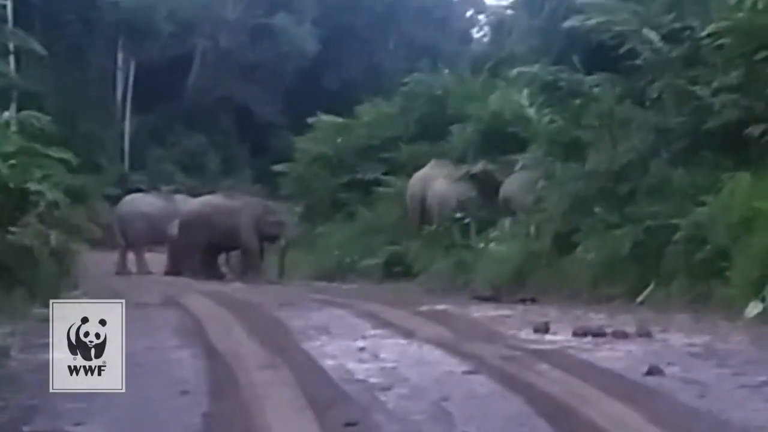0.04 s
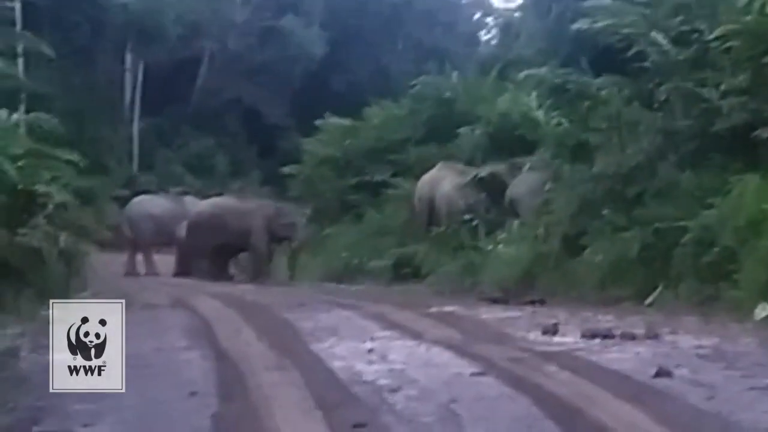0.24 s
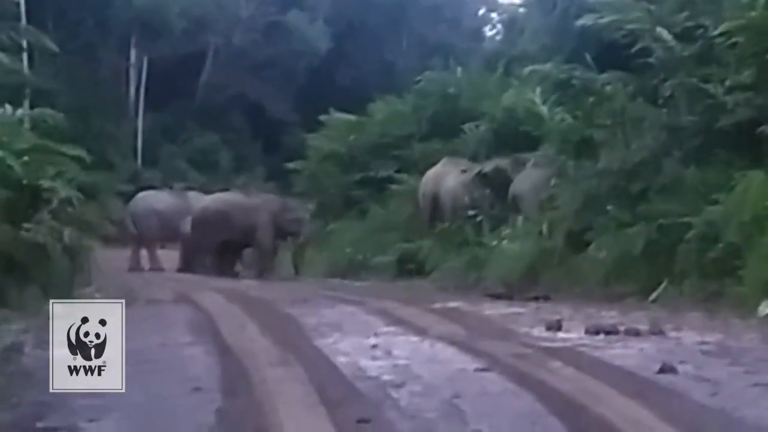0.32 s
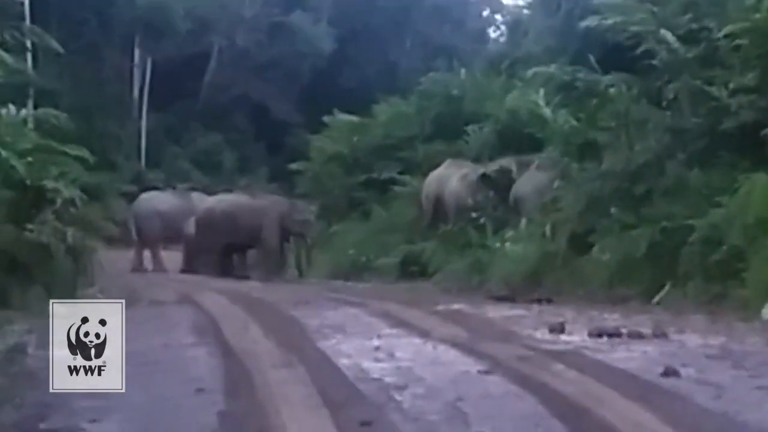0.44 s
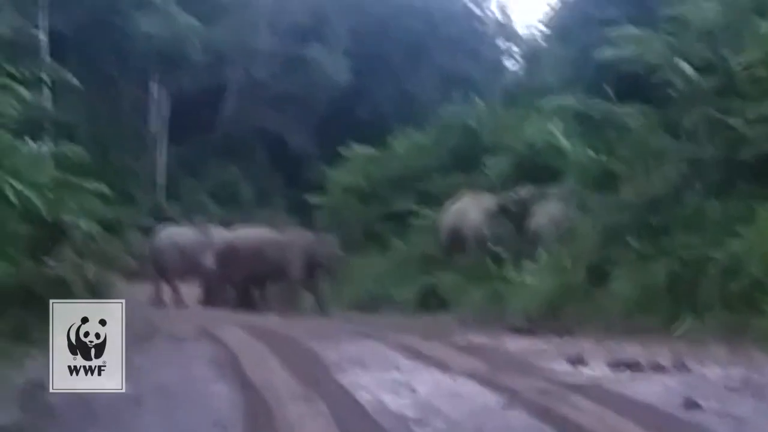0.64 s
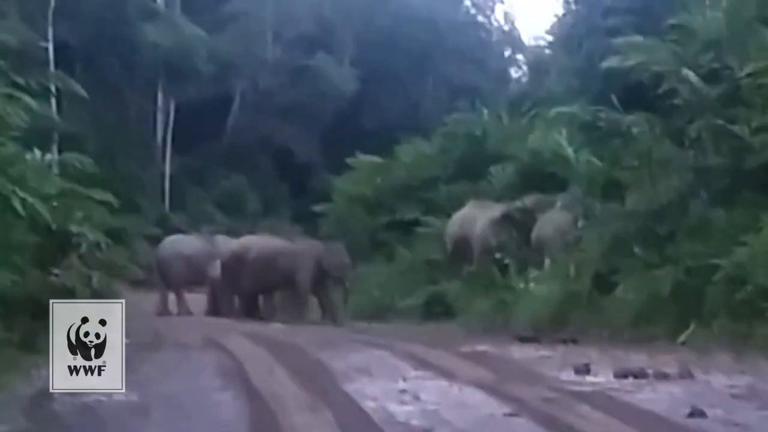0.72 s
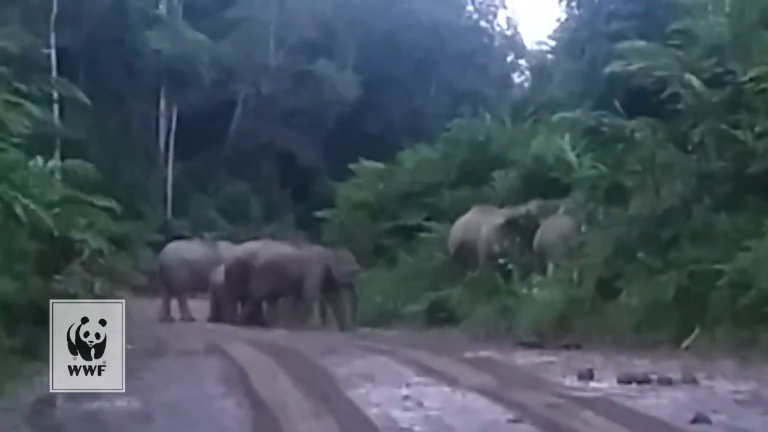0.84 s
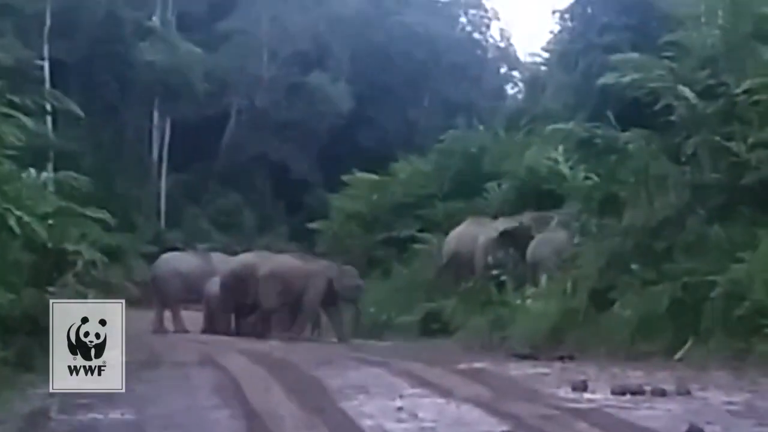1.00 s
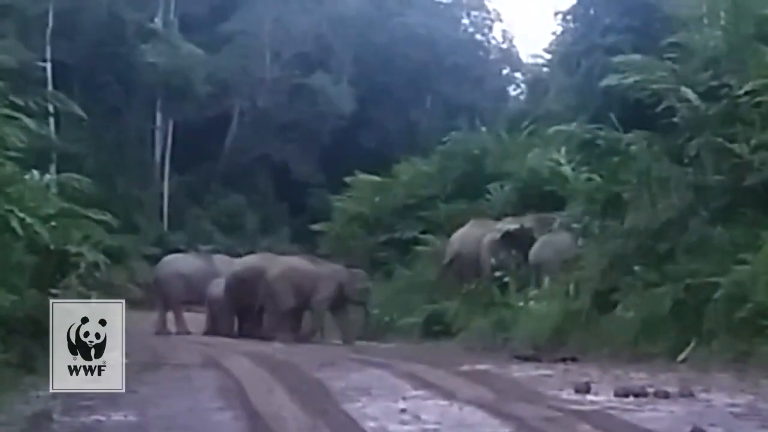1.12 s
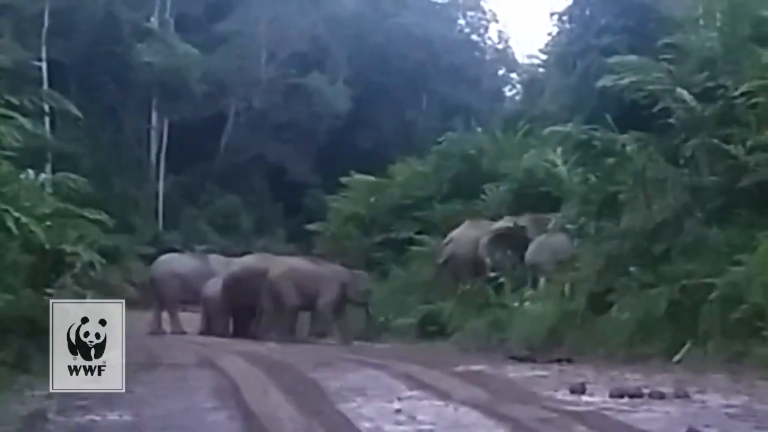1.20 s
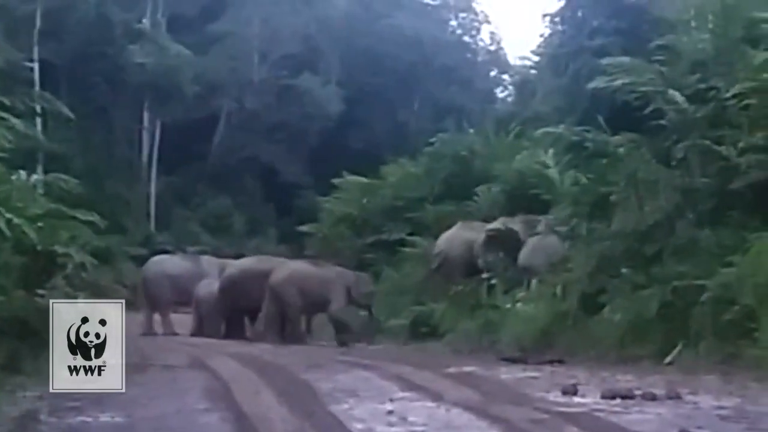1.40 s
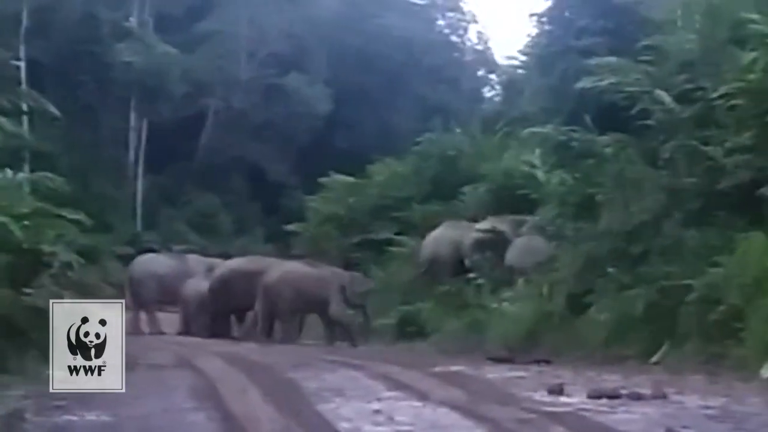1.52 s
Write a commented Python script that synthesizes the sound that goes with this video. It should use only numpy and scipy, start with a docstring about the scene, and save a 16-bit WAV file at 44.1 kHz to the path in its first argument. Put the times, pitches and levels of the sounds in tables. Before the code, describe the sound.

One raspy elephant roar swells and fades among trees while cicadas and crickets sing.

```python
"""An elephant roars once on a forest road, some way off, and the trees throw the roar back.
Its high, unsteady voice and rushing breath are chopped by a slower flutter of the throat, which
also sounds as a low growl; at the peak a clear tone comes through and briefly steadies the roar.
Cicadas and crickets sing over the forest bed, with a faint whistle early on,
and one soft knock sounds in the dying echo."""
import sys
import numpy as np
from scipy import signal
from scipy.fft import rfft, irfft
from scipy.io import wavfile
from scipy.ndimage import uniform_filter1d

SR = 44100
rng = np.random.default_rng(int(sys.argv[2]) if len(sys.argv) > 2 else 0)


def persist_wave(psi):
    """Save psi, clipped to +-1, as 16-bit WAV."""
    counts = np.round(np.clip(psi, -1, 1) * 32767).astype(np.int16)
    wavfile.write(sys.argv[1], SR, np.atleast_2d(counts).T)


N = 68355

# EQ of the forest bed: f/Hz, relative level/dB
BED_EQ = [(25, -42), (42, -23), (52, -5), (90, 4.5), (170, -1.5), (300, -4), (420, -0.5), (600, -12.5),
          (950, -4.5), (1300, -8.5), (1650, -13), (2100, -4), (2600, -12.5), (3050, 0), (3400, -23.5),
          (4200, -14), (6000, -15), (7600, -20), (9000, -31.5), (12000, -39), (15500, -43)]
# reverb time among the trees: f/Hz, t60/s
FOREST_DECAY = [(120, 0.71), (700, 1.01), (1500, 1.374), (2300, 1.322), (4000, 1.22), (8000, 1.06),
                (13000, 0.89)]
# cicada choruses: f/Hz, width/Hz, starting level/dB
CICADA_BANDS = [(4657, 110, -57.5), (5316, 260, -56.5), (6200, 60, -61.5), (6510, 230, -60),
                (6958, 71, -53.5), (7144, 43, -63)]
# cricket phrase cues: t/s, level/dB
CRICKET_CUES = [(.015, -44.5), (.41, -43), (.96, -42.5), (1.16, -44)]
# phrase cues of a higher, falling chirp: t/s, level/dB
CHIRP_CUES = [(.125, -66), (1.085, -60), (1.32, -59)]
# envelope of the clear tone in the voice: t/s, level/dB
CLEAR_ENVELOPE = [(.64, -65.5), (.7, -39), (.76, -38.5), (.81, -33.5), (.88, -35), (.915, -57), (1.08, -60),
                  (1.16, -64)]
# harmonics of the clear tone: harmonic number, relative level/dB
CLEAR_HARMONICS = [(1, -1.5), (2, -14), (3, -6), (4, -7), (5, -3.5)]
# envelope of the low growl: t/s, level/dB
GROWL_ENVELOPE = [(.165, -94), (.195, -39), (.27, -45.5), (.335, -37.5), (.5, -41), (.555, -44.5),
                  (.62, -39), (.675, -44), (.78, -44), (.88, -45.5), (.968, -40.5), (1.025, -59),
                  (1.09, -85)]
# chest EQ on the growl: f/Hz, relative level/dB
CHEST_EQ = [(25, -62), (42, -36), (52, -20), (75, -7.5), (130, -5), (190, -3), (235, -12.5), (300, -5.5),
            (380, -19.5), (560, -20), (1000, -21.5), (3000, -70)]
# EQ on the rushing breath: f/Hz, relative level/dB
BREATH_EQ = [(100, -29), (560, -22), (720, -4.5), (850, -13.5), (950, -17.5), (1200, -5), (1480, 0),
             (1800, -5), (2200, 5), (2600, 1), (3400, -15), (4800, -12.5), (6500, -16), (8000, -21.5),
             (10000, -25.5), (12000, -38.5), (15000, -62)]
# throat resonances on the voice: f/Hz, relative level/dB
VOICE_EQ = [(300, -36), (570, -38), (700, -13), (860, -2), (950, -14.5), (1200, -2.5), (1450, -0.5),
            (1580, -6), (1820, -9.5), (2050, 5), (2280, -1), (2480, -5), (2900, -4.5), (3300, -6.5),
            (3700, -5.5), (4500, -12), (7000, -26), (12000, -44)]
# the roar's gesture: t/s, f/Hz, level/dB, roughness 0-1, tilt/(dB per octave),
# mouth opening (a factor on the resonance frequencies)
ROAR_GESTURE = [(.175, 515, -88, 0.08, -8.5, .74), (.2, 532.2, -43, 0.2, -8.5, 0.88),
                (.222, 600.2, -35, 0.57, -4.5, 1), (.248, 690.7, -29.5, 0.84, -4.5, 0.98),
                (.35, 711.7, -25.5, 0.58, -0.5, 0.96), (.41, 726.5, -27.5, 0.83, -3, 1.065),
                (.48, 760.5, -26.5, 0.82, -0.7, 1.04), (.55, 775.5, -24, 0.9, 0.4, 1),
                (.6, 761, -27.5, .95, 2, 1.09), (.63, 751, -21.5, 0.89, .5, 0.98),
                (.67, 748, -26, 0.88, -1, 1.09), (.72, 742, -24, 0.66, -2.5, 1.065),
                (.81, 729.9, -25, 0.53, 1, 1.051), (.86, 725.6, -24.5, 0.46, 1.5, 1.02),
                (.895, 716.1, -23.5, 0.66, -.5, 0.955), (.92, 712, -25, 0.83, -0.5, 1.04),
                (.958, 705.2, -23.5, 0.98, 0.3, 0.97), (.995, 698.7, -29.7, .98, -1.8, 0.99),
                (1.06, 689.7, -37.5, .98, -2, 0.844), (1.16, 687.6, -51, 0.99, -4, .95),
                (1.22, 680, -80, 0.96, -2.3, 0.98)]

TIME = np.arange(N) / SR


def amp(db):
    """Decibels to gain."""
    return 10 ** (np.asarray(db) / 20)


def unit_rms(x):
    """Normalises to unit rms."""
    return x / np.sqrt(np.mean(x ** 2) + 1e-20)


def lookup(table, hz):
    """Reads a frequency table on a log axis."""
    f, value = np.transpose(table)
    return np.interp(np.log(hz + 1), np.log(f + 1), value)


def envelopes(table):
    """One envelope for each value column of a time table."""
    times, *columns = np.transpose(table)
    return [np.interp(TIME, times, column) for column in columns]


def bell_curve(peak_s, width_s):
    """A Gaussian fade in and out."""
    return np.exp(-.5 * ((TIME - peak_s) / width_s) ** 2)


def equalise(x, eq):
    """Applies an EQ curve, to unit rms."""
    return unit_rms(irfft(rfft(x) * amp(lookup(eq, np.fft.rfftfreq(N, 1 / SR))), N))


def wander(hz):
    """A smooth random modulator, moving at rates up to about hz."""
    f = np.fft.rfftfreq(N, 1 / SR)
    lowpass = np.exp(-.5 * (f / hz) ** 2) * (f > 0)
    return unit_rms(irfft(rfft(rng.standard_normal(N)) * lowpass, N))


def noise_band(hz, width_hz):
    """A narrow band of noise around a pitch."""
    phase = 2 * np.pi * hz * TIME
    return unit_rms(wander(width_hz) * np.cos(phase) + wander(width_hz) * np.sin(phase))


def forest_bed(level_db=-51):
    """The steady, low hush of the forest."""
    return amp(level_db) * equalise(rng.standard_normal(N), BED_EQ)


def forest_echo(x, wet_db, build_s=0.009, echoes_per_s=2500):
    """Direct sound plus scattered echoes from trunks and leaves, each band dying at its own speed."""
    taps = rng.standard_normal(N) * (rng.random(N) < echoes_per_s / SR)
    taps *= 1 - np.exp(-TIME / build_s)
    hz, t, spectrum = signal.stft(taps, SR, nperseg=256)
    decay = amp(-60 * t / lookup(FOREST_DECAY, hz)[:, None])
    tail = signal.istft(spectrum * decay, SR, nperseg=256)[1][:N]
    wet = signal.fftconvolve(x, tail / np.linalg.norm(tail))[:N]
    return (x + amp(wet_db) * wet) / np.hypot(1, amp(wet_db))


def cicadas(throb_db=1.5, throb_hz=45, swell_db_per_s=1.4):
    """Many far insects merge into throbbing bands that slowly swell."""
    chorus = sum(amp(db) * noise_band(hz, width_hz) * unit_rms(amp(throb_db * wander(throb_hz)))
                 for hz, width_hz, db in CICADA_BANDS)
    return chorus * amp(swell_db_per_s * TIME)


def wing_strokes(cues, hz, fall_hz, wobble_hz, step_s, pulse_s, count):
    """Insect phrases of evenly spaced wing strokes, each a short, slightly unsteady tone."""
    out = np.zeros(N)
    for start, db in cues:
        age = TIME - start
        stroke = np.clip(age % step_s / pulse_s, 0, 1)
        pulses = np.sin(np.pi * stroke) * (age > 0) * (age < count * step_s)
        pitch = hz + fall_hz * (.5 - stroke) + wobble_hz * wander(420)
        tone = np.sqrt(2) * np.sin(2 * np.pi * np.cumsum(pitch) / SR)
        out += amp(db) * pulses * tone
    return out


def whistle(hz=937, peak_db=-61):
    """A faint, far whistle, perhaps a bird."""
    return amp(peak_db) * bell_curve(peak_s=0.15, width_s=0.12) * np.sin(2 * np.pi * hz * TIME)


def knock(at_s=1.167, hz=414, peak_db=-34):
    """One soft, dull knock without a ring."""
    return -amp(peak_db) * bell_curve(at_s, width_s=0.00097) * np.cos(2 * np.pi * hz * (TIME - at_s))


def clear_tone(detune=.987, squeal_db=-21):
    """The voice's steady part: clean harmonics; the third squeals on meeting the main throat resonance."""
    pitch = envelopes(ROAR_GESTURE)[0] * (detune + 0.0041 * wander(48))
    phase = 2 * np.pi * np.cumsum(pitch) / SR
    harmonics = sum(amp(db) * np.cos(k * phase) for k, db in CLEAR_HARMONICS)
    squeal = amp(squeal_db) * bell_curve(peak_s=.895, width_s=0.01) * np.cos(3 * phase)
    return amp(envelopes(CLEAR_ENVELOPE)[0]) * harmonics + squeal


def throat(x, eq, tilt_db, mouth):
    """Resonances that rise as the mouth opens, with a brightness tilt pivoting on 2 kHz."""
    hz, t, spectrum = signal.stft(x, SR, nperseg=1024, noverlap=768)
    tilt_db, mouth = [np.interp(t, TIME, envelope) for envelope in (tilt_db, mouth)]
    octaves = np.log2(np.clip(hz, 1000, 9000) / 2000)[:, None]
    gain = amp(lookup(eq, hz[:, None] / mouth) + octaves * tilt_db)
    return unit_rms(signal.istft(spectrum * gain, SR, nperseg=1024, noverlap=768)[1][:N])


def flutter(hz=133.1, jitter=.26, open_share=0.35):
    """The throat flaps unevenly, letting out one decaying puff of air each cycle."""
    cycle = np.cumsum(hz * (1 + jitter * wander(111))) / SR % 1
    return unit_rms(uniform_filter1d(np.exp(-cycle / open_share), size=40))


def roar(jitter=.066, pitch_pull=0.047, shimmer_db=1.26, leak=1):
    """A jittering voice and rushing breath, chopped by the flutter, which itself sounds as a low growl."""
    hz, level_db, roughness, tilt_db, mouth = envelopes(ROAR_GESTURE)
    puffs = flutter()
    shimmer = amp(shimmer_db * wander(35))
    airflow = (leak + puffs) * shimmer
    swing = puffs - puffs.mean()
    pitch = hz * (1 + jitter * roughness * wander(130.4) + pitch_pull * swing)
    phase = 2 * np.pi * np.cumsum(pitch) / SR
    buzz = sum(np.cos(k * phase) for k in range(1, 13))
    voice = throat(airflow * buzz, VOICE_EQ, tilt_db, mouth)
    breath = throat(airflow * rng.standard_normal(N), BREATH_EQ, tilt_db, mouth)
    cry = unit_rms(voice + amp(5.5 * (roughness - 1)) * breath)  # rougher means breathier
    rasp = 1.28 * airflow * rng.standard_normal(N)
    growl = equalise(swing * shimmer + rasp, CHEST_EQ)
    return amp(level_db) * cry + amp(envelopes(GROWL_ENVELOPE)[0]) * growl


def scene():
    """The mono mix: the elephant among the trees, over insects and the forest bed."""
    elephant = forest_echo(roar(), wet_db=-1) + forest_echo(clear_tone(), wet_db=-17)
    crickets = wing_strokes(CRICKET_CUES, hz=6200, fall_hz=0, wobble_hz=58,
                            step_s=0.036, pulse_s=0.031, count=3)
    chirps = wing_strokes(CHIRP_CUES, hz=8080, fall_hz=700, wobble_hz=224,
                          step_s=0.02, pulse_s=0.018, count=5)
    ambience = forest_bed() + cicadas() + forest_echo(crickets + chirps, wet_db=-7)
    return (ambience + whistle() + knock() + elephant)[None]


def record(dry):
    """A steep high cut takes the very top off the mix."""
    high_cut = signal.firwin(511, 15650, window=("kaiser", 9), fs=SR)
    return signal.oaconvolve(dry, high_cut[None], "same")


dry = scene()
out = record(dry)
persist_wave(out)
```